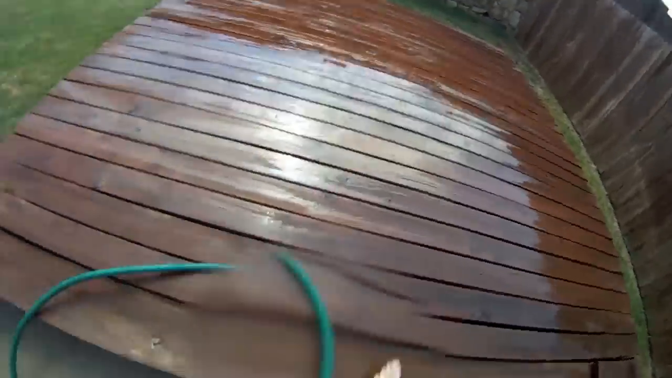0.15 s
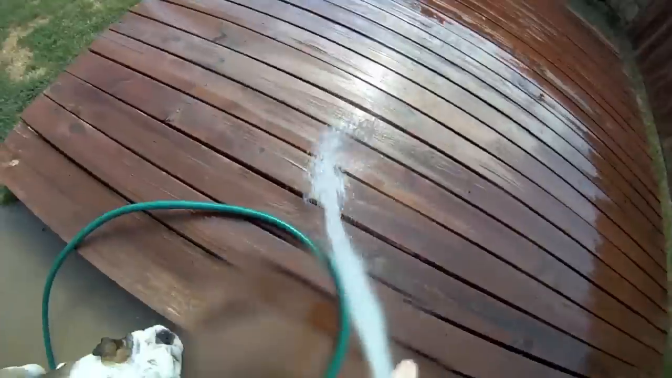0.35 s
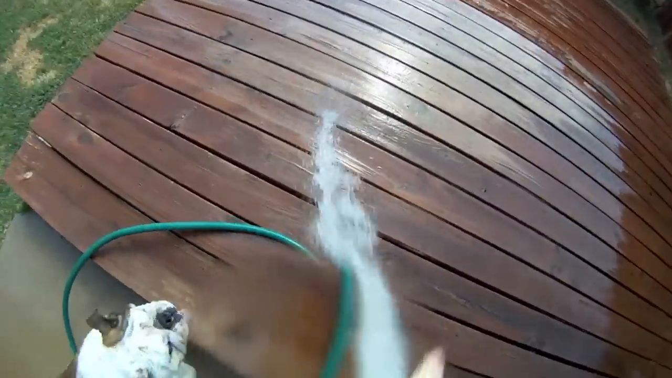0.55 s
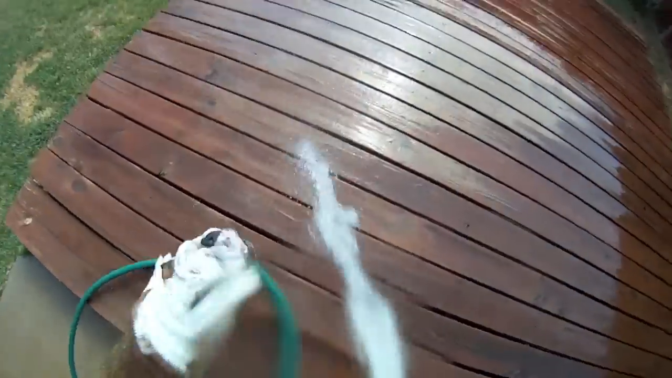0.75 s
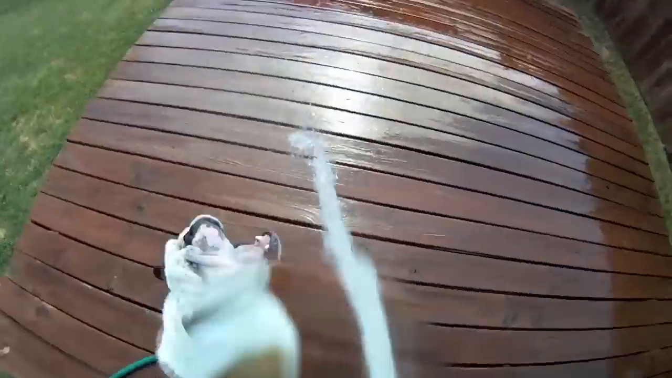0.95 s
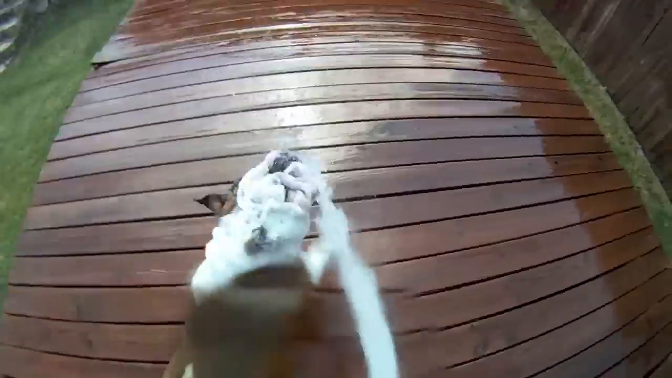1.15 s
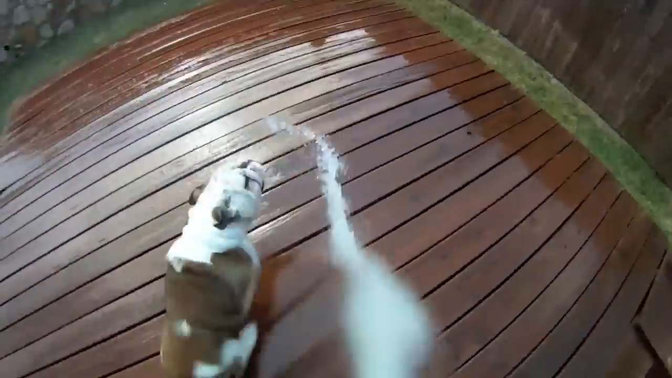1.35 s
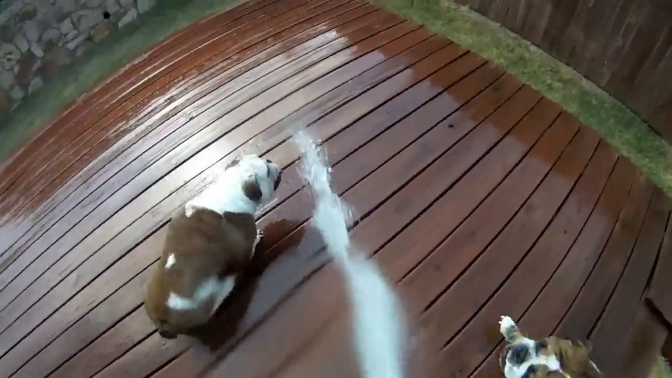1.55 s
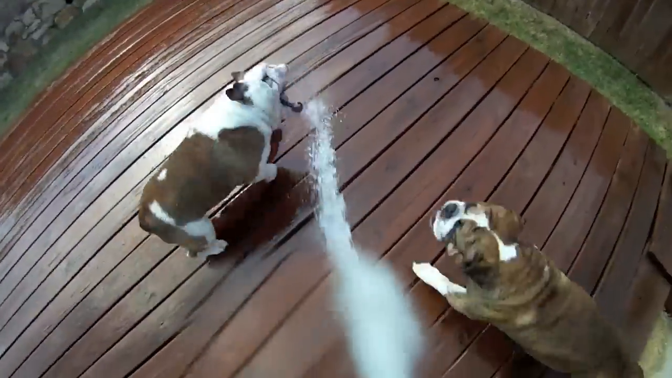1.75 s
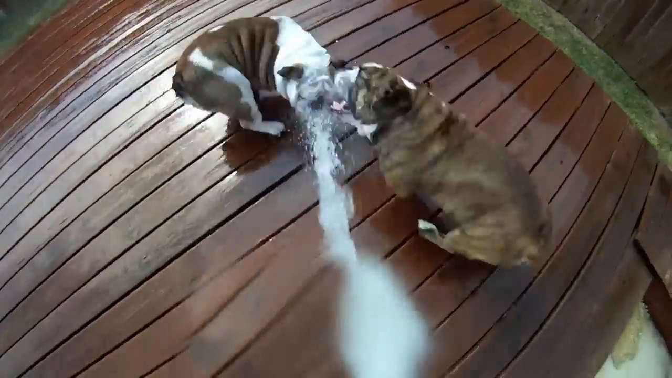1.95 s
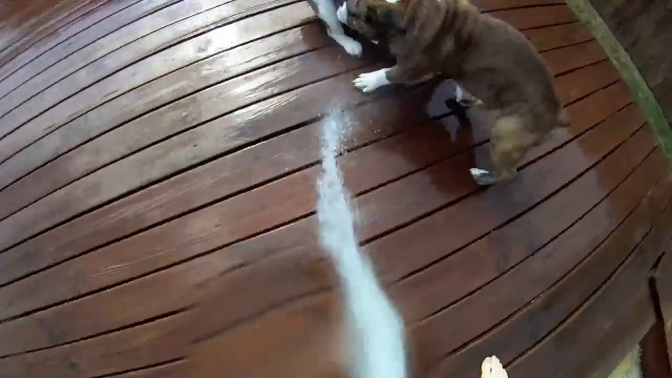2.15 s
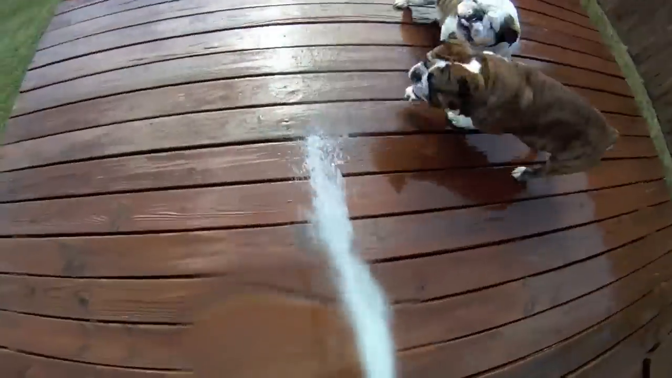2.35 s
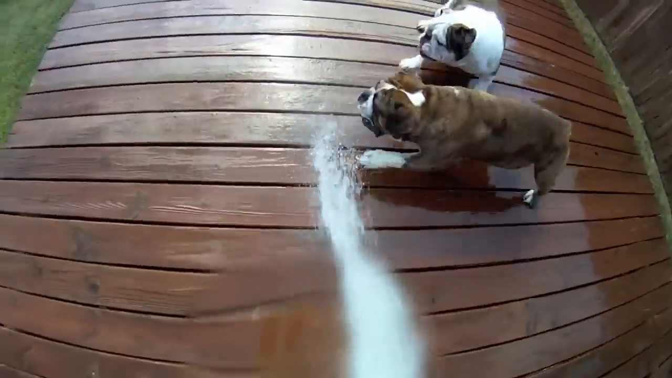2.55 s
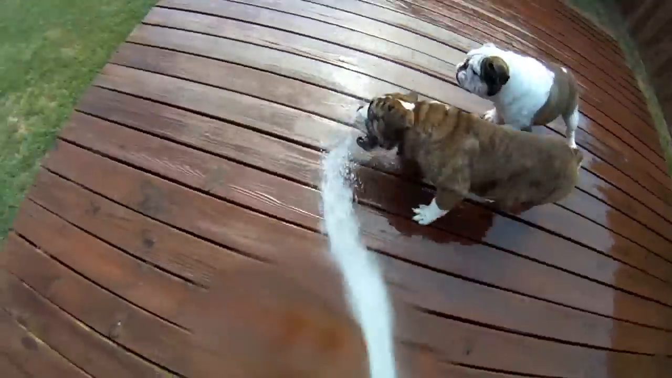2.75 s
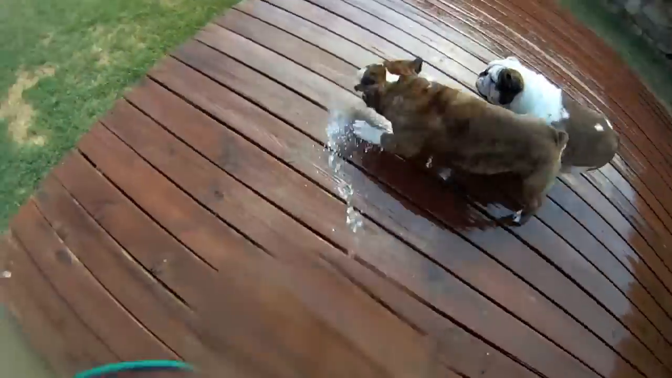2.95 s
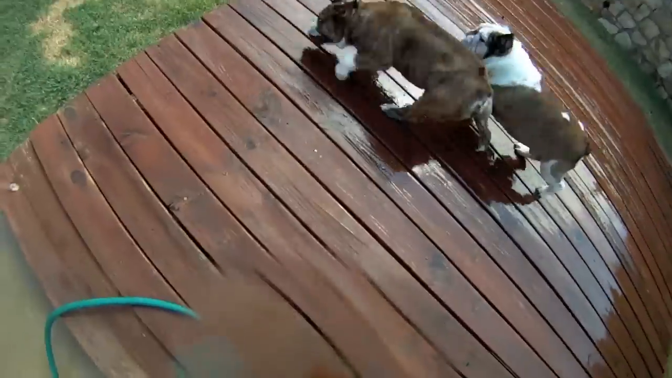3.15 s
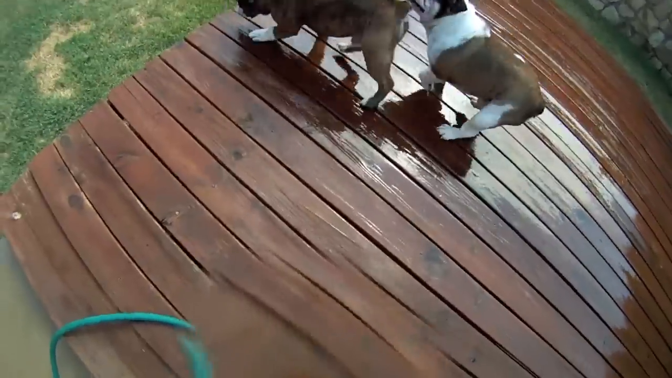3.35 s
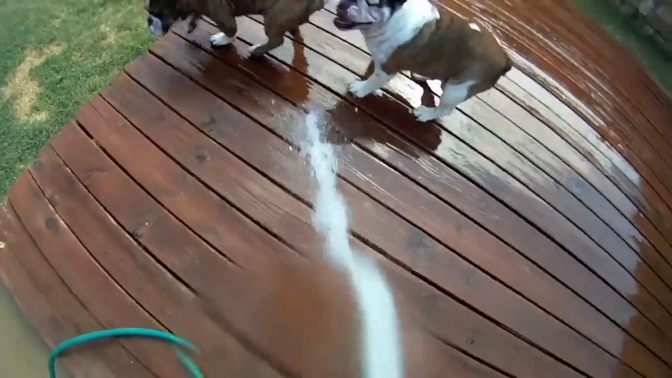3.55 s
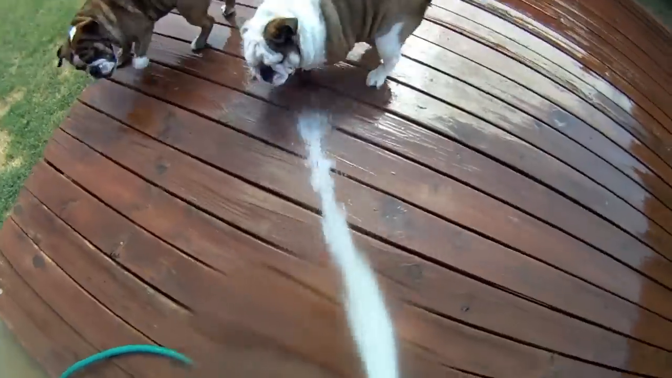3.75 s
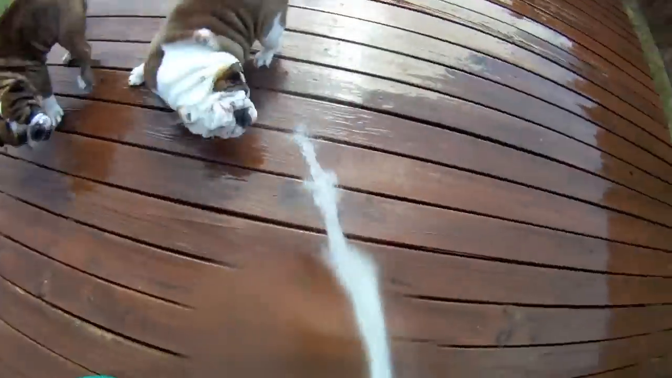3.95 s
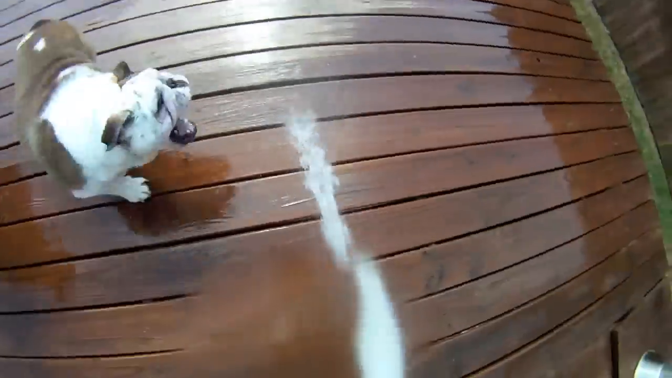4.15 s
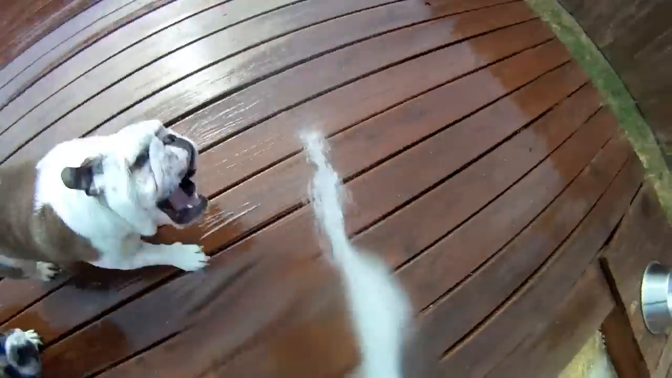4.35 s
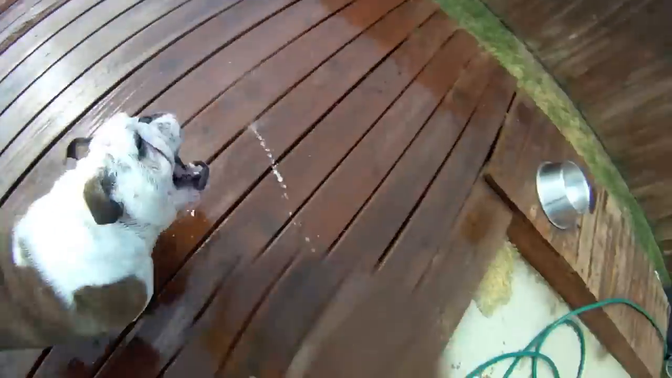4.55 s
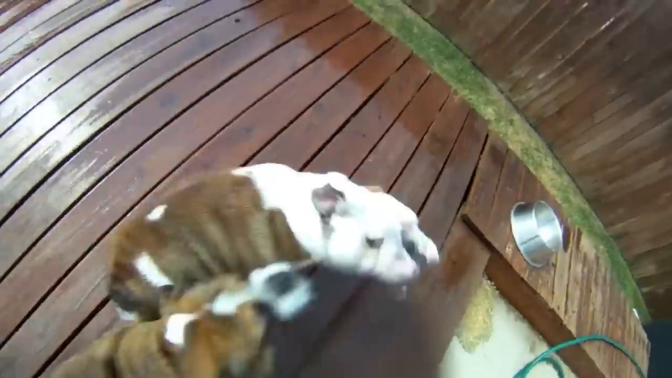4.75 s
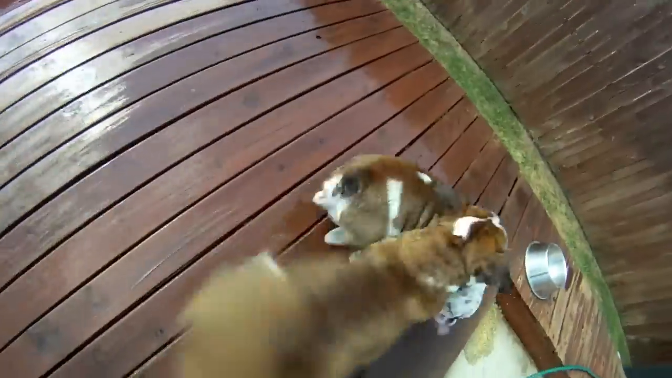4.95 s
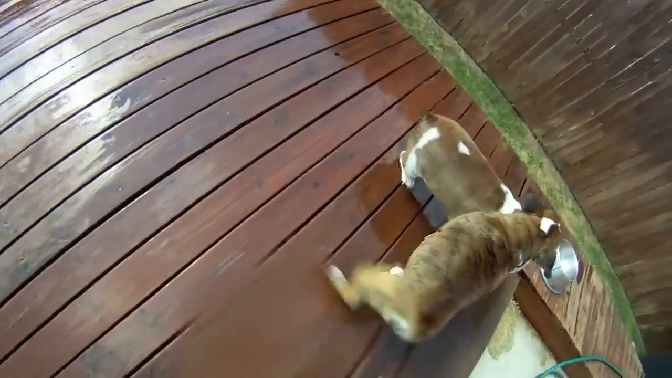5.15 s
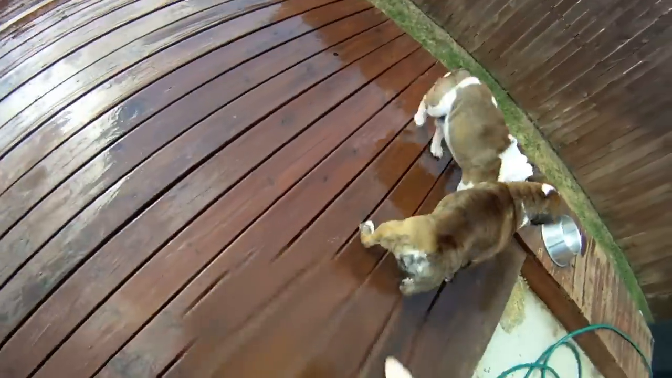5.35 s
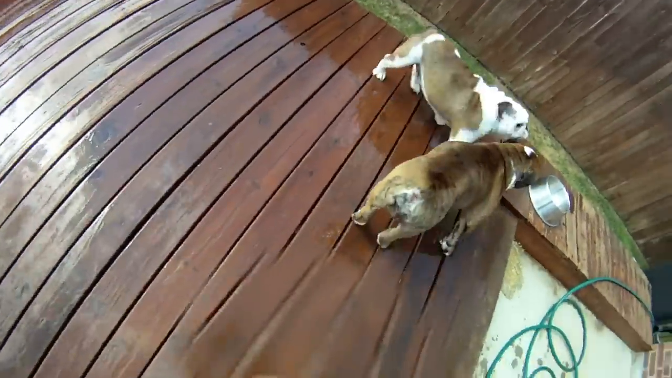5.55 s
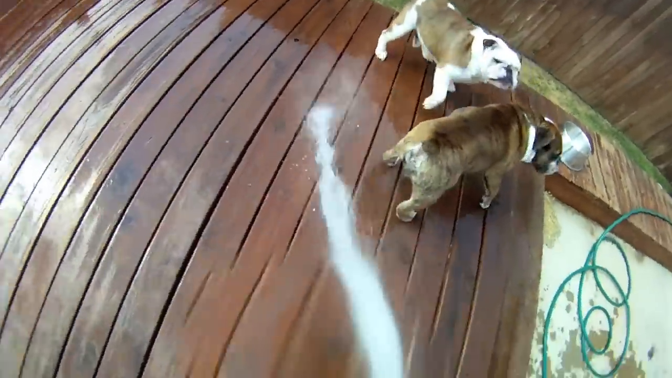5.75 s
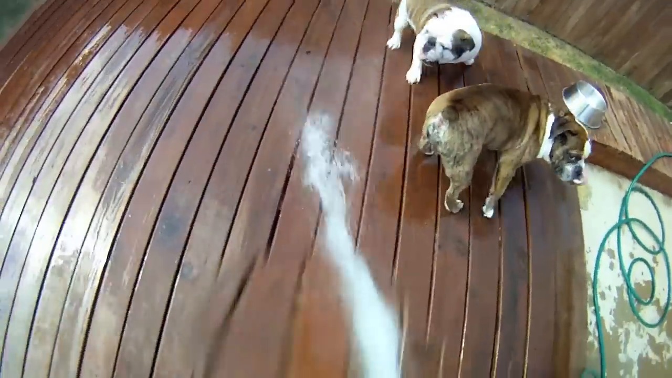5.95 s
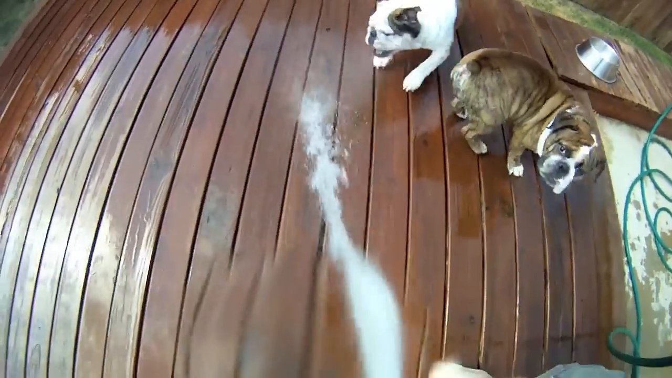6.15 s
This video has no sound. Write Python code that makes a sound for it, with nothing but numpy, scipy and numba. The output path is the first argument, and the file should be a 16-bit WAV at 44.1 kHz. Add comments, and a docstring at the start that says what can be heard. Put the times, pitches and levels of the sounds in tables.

```python
"""A garden hose on a wooden deck, heard from inside a waterproof case fixed to the spray gun.
Trigger snaps, a rustle of handling, a knock of the hand and claws come first; then the jet roars through
the case's resonances. The valve slams and the hose kicks; drops and claws follow, then a second burst,
more paws and a scuff of the hand on the grip. A last burst is still running at the end.
Loud snaps overload the recorder and duck its gain."""
import sys
import numpy as np
from scipy import signal
from scipy.fft import rfft, irfft, next_fast_len
from scipy.io import wavfile
from numba import njit

SR = 44100
rng = np.random.default_rng(int(sys.argv[2]) if len(sys.argv) > 2 else 0)


def store_pcm(level_fs):
    """Save levels as 16-bit WAV."""
    pcm = np.round(np.clip(level_fs, -1, 1) * 32767).astype(np.int16)
    wavfile.write(sys.argv[1], SR, np.atleast_2d(pcm).T)


N = 273861
TIME = np.arange(N) / SR
SIZE = 2 * next_fast_len(N // 2 + 8192)  # transform length, with room for filter tails
HZ = np.arange(SIZE // 2 + 1) * SR / SIZE

# trigger pulls: opens_s, shuts_s, rise_s, opening squirt relative_db
PULLS = [(0.27, 2.997, 0.056, -19), (3.539, 4.563, 0.06, -20.5), (5.688, 6.4, 0.039, -17)]
# lighter clacks as the trigger is eased: start_s, relative_db
CLACKS = [(2.9390, -8), (4.5244, -10.5)]
# soft bumps of the hand and of paws: start_s, relative_db, pitch_hz
BUMPS = [(0.021, 4.5, 144), (0.075, -3, 155), (0.208, -6, 119), (1.445, -9.5, 98), (4.921, -34.5, 130),
         (4.992, -30.5, 110), (5.1, -36, 120), (5.251, -11, 112)]
BUMP_SWELL_S = 0.0068
# ring of the gun's hollow body: pitch_hz, relative_db, t60_s
BODY_MODES = [(249, -14, 0.061), (322, -11, 0.021), (579, -6.5, 0.0094)]


def from_db(db):
    """Decibels to gain."""
    return 10 ** (np.asarray(db) / 20)


def rms_one(x):
    """Scale to unit power."""
    return x / np.sqrt(np.mean(x ** 2) + 1e-20)


def through(x, response):
    """Filter by a frequency response."""
    return irfft(rfft(x, SIZE) * response, SIZE)[:N]


def noise(spectrum):
    """Noise of unit power, coloured by (Hz, dB per Hz) points joined along log frequency."""
    hz, db = np.transpose(spectrum)
    colour_db = np.interp(np.log(HZ + 1), np.log(hz), db)
    return rms_one(through(rng.standard_normal(N), from_db(colour_db)))


def drift(rate_hz):
    """Slow random wandering with a spread of one."""
    return rms_one(through(rng.standard_normal(N), 1 / (1 + (HZ / rate_hz) ** 2)))


def bell(s, half):
    """A smooth swell of height one around a moment."""
    return np.exp(-((TIME - s) / half) ** 2)


def clicks(rows):
    """One impulse for each (s, dB) row."""
    out = np.zeros(N)
    for s, db in rows:
        at = max(0, round(s * SR))
        out[at:at + 1] += from_db(db)
    return out


def bounces(rows, length, bounce_db):
    """Each contact is followed by a brief burst of smaller, uneven rebounds."""
    out, age = np.zeros(N + SR), TIME[:SR // 40]
    chances = rng.standard_normal((len(rows), len(age)))
    for (s, db), chance in zip(rows, chances):
        burst = chance * np.exp(-age / length)
        burst *= from_db(bounce_db) / np.linalg.norm(burst)
        burst[0] += 1  # the contact itself
        at = max(0, round(s * SR))
        out[at:at + len(age)] += from_db(db) * burst
    return out[:N]


def ring_decay(t60):
    """Gain per sample that falls by 60 dB in t60 seconds."""
    return from_db(-60 / (t60 * SR))


def ring(x, hz, t60):
    """A two-pole resonator: a unit click sets a sine of height one ringing."""
    r, w = ring_decay(t60), 2 * np.pi * hz / SR
    return signal.lfilter([0, np.sin(w)], [1, -2 * r * np.cos(w), r * r], x + 1e-18)


def strike(hits, modes):
    """Ring a table of (Hz, dB, t60) modes together."""
    return sum(ring(hits * from_db(db), hz, t60) for hz, db, t60 in modes)


def swing(rows, hz, swell):
    """A low swing for each (s, dB) row; it swells and dies in a few cycles."""
    age = TIME[:SR // 4]
    envelope = (age / swell * np.exp(1 - age / swell)) ** 2
    return signal.oaconvolve(clicks(rows), envelope * np.sin(2 * np.pi * hz * age))[:N]


def drops(per_s, spread_db):
    """Impulses land at random like drops, most small and a few large."""
    sizes = from_db(spread_db * np.minimum(rng.exponential(1, N), 4))
    signed = sizes * rng.choice([-1, 1], N)
    return rms_one(signed * (rng.random(N) < per_s / SR))


def bright_band(x):
    """The bright band of the scratches and of the fine grains, 2.2 to 9 kHz."""
    return signal.sosfilt(signal.butter(1, [2200, 9000], "band", fs=SR, output="sos"), x)


def case_response():
    """Steep-sided resonances made causal (minimum phase); a unit click comes out with height one."""
    # resonances of gun and case: pitch_hz, width_hz, relative_db
    resonances = [(336, 95, -21.2), (483, 131, -11.7), (706, 212, -15.8), (944, 193, -1.2),
                  (1210, 123, -4.7), (1589, 220, -2.8), (1976, 357, -0.4), (2345, 210, 0.0),
                  (2914, 229, -10.4), (3214, 550, -22.0), (3734, 377, -19.0), (4632, 428, -35.9),
                  (5290, 511, -39.0), (7079, 1704, -41.6), (8300, 488, -26.2), (9059, 407, -21.8),
                  (9658, 220, -11.6), (10020, 270, -13.2), (10401, 210, -18.3), (10788, 128, -23.4),
                  (11050, 193, -22.1), (11504, 108, -37.6), (11882, 70, -37.5), (12121, 70, -36.8),
                  (12954, 264, -24.5), (13216, 114, -24.4), (13597, 215, -20.3), (13980, 299, -15.8),
                  (14343, 227, -14.5), (14931, 315, -24.2)]
    power = sum(from_db(db) ** 2 / (1 + (2 * (HZ - hz) / width) ** 2) ** 2
                for hz, width, db in resonances)
    cepstrum = irfft(np.log(power) / 2)
    response = np.exp(rfft(2 * cepstrum[:SIZE // 2], SIZE))
    return response / np.abs(irfft(response)).max()


def yard():
    """A wash of coloured outdoor noise, with a faint narrow tone from noise ringing one resonator."""
    # outdoor wash: pitch_hz, relative_db per Hz
    wash_colour = [(100, -6), (350, -6.5), (650, -10), (900, -2), (1140, -4), (1400, -22), (2300, -3),
                   (4000, -14), (6000, -29), (9500, -15), (12000, -30), (14500, -24)]
    faint_tone = rms_one(ring(rng.standard_normal(N), hz=1159, t60=.12))
    return from_db(-58.0) * noise(wash_colour) + from_db(-67.5) * faint_tone


def rustling(case):
    """Random impulses rustle through the case, with bright grains, in flurries over a constant trickle."""
    # flurries of handling, water and paws: centre_s, half_length_s, rustle level_db
    flurries = [(0.153, 0.12, -44.5), (3.247, 0.068, -58), (4.846, 0.079, -59), (5.19, 0.11, -64)]
    trickle_db, grains_db = -66.5, -10.5  # the grains are relative to their flurry
    rustle = rms_one(through(drops(per_s=1500, spread_db=2.5), case))
    grains = rms_one(bright_band(drops(per_s=3000, spread_db=2.5)))
    flurry = sum(from_db(db) * bell(s, half) for s, half, db in flurries)
    return np.hypot(flurry, from_db(trickle_db)) * rustle + flurry * from_db(grains_db) * grains


def claws(case):
    """Claws and big drops hit the boards: a dull tap through the case and a longer bright scratch."""
    # contacts: start_s, dull body relative_db, bright scratch relative_db
    contacts = [(0.2078, -34, -58.5), (3.1018, -51, -48), (3.188, -49, -68), (3.474, -48.5, -69),
                (4.6955, -52, -61), (4.8413, -51, -47), (4.8735, -50, -53), (4.9048, -53, -50),
                (4.991, -35, -58), (5.099, -47, -66), (5.152, -49, -55), (5.177, -56, -47),
                (5.331, -56, -53)]
    dull = bounces([(s, db) for s, db, _ in contacts], length=0.0025, bounce_db=13)
    bright = bounces([(s, db) for s, _, db in contacts], length=0.008, bounce_db=20)
    return through(dull, case) + bright_band(bright)


def scuff():
    """A hand slides briefly on the grip: coloured noise with an unsteady level."""
    # one slide: centre_s, half_length_s, level_db
    slide = (5.53, 0.11, -54.5)
    # its colour: pitch_hz, relative_db per Hz
    scuff_colour = [(200, -37), (600, -19), (900, 3.5), (1300, -1), (2400, -24), (5000, -35), (15000, -54)]
    s, half, db = slide
    unsteady = from_db(db + 2.1 * drift(rate_hz=38))
    return unsteady * np.exp(-((TIME - s) / half) ** 4) * noise(scuff_colour)


def handling():
    """The hand rumbles softly on the grip, and more while the gun shakes after a bump."""
    # the hand's rumble: pitch_hz, relative_db per Hz
    hand_colour = [(8, -22.5), (28, 3.5), (55, -3), (90, -8.5), (125, -10.5), (175, -21.5), (300, -32),
                   (600, -48.5), (4000, -120)]
    steady_db, shake_db, fade_db_per_s = -41.5, -17.5, 125.5  # the shake is relative to its bump
    shake = 0
    for s, db, _ in BUMPS:
        rise = np.clip((TIME - s) / BUMP_SWELL_S, 0, 1)
        shake = shake + rise * from_db(db + shake_db - fade_db_per_s * np.abs(TIME - s))
    return (from_db(steady_db) + shake) * noise(hand_colour)


def kicks():
    """The gun recoils when the flow starts, eases and stops, and swings when it is bumped."""
    lead_s = 0.01  # easing and shutting recoils begin this early
    recoils = ([(opens, -2.5) for opens, *_ in PULLS]
               + [(s - lead_s, -8.5) for s, _ in CLACKS]
               + [(shuts - lead_s, -2.5) for _, shuts, *_ in PULLS])
    out = swing(recoils, hz=87.5, swell=0.0043)
    out = out + sum(swing([(s, db)], hz, BUMP_SWELL_S) for s, db, hz in BUMPS)
    return signal.sosfilt(signal.butter(1, 30, "high", fs=SR, output="sos"), out + 1e-18)


def valve():
    """The stopped water column and the grip knock hollowly, with a thin metallic ring on top."""
    # hard knocks of the grip: start_s, relative_db, pitch_hz
    grip_knocks = [(0.021, 9, 910), (0.052, -12, 885), (0.0770, -6.5, 890), (0.0850, -6.5, 845),
                   (0.214, -27.5, 850), (3.5661, -9, 990), (5.252, -38.5, 974), (5.709, -13.5, 1150)]
    # ring of the water column: pitch_hz, relative_db, t60_s
    column_modes = [(440, -6.5, 0.008), (680, -4, 0.0071), (860, 5, 0.019), (1060, -11.5, 0.055)]
    # ring struck by the hits: a thin metallic ring of the valve, and a long low ring of the case near 1.1 kHz:
    # pitch_hz, relative_db, t60_s
    struck_modes = [(1140, -33, .16), (11120, -15, 0.021), (12120, -34.5, 0.08), (12700, -22, 0.025)]
    lead_s, rebound_s, rebound_db = 0.0027, 0.00429, -10.5
    seats = [shuts - lead_s for _, shuts, *_ in PULLS]
    # water hammer as the valve seats, then its rebound
    hammer = clicks([(s, 0) for s in seats]) + clicks([(s + rebound_s, rebound_db) for s in seats])
    hammer = from_db(-4.5) * hammer
    knock = sum(ring(clicks([(s, db)]), hz, t60=0.03) for s, db, hz in grip_knocks)
    hits = from_db(-3) * hammer + clicks([(s, db) for s, db, _ in grip_knocks])
    metal = from_db(-1) * strike(hits, struck_modes)
    return strike(hammer, column_modes) + knock + metal + strike(hits, BODY_MODES)


def trigger(case):
    """Each snap rings the trigger and jolts the gun's body and the case; the clacks are thinner."""
    # trigger snaps: start_s, contact relative_db, jolt to the gun's body relative_db
    snaps = [(0.0200, 11.5, 8.5), (0.0513, -12, 1), (0.0739, 3.5, -7), (0.3089, 14, 10.5),
             (0.3615, 20.5, 20), (3.5235, -13.5, -16), (3.5872, 14, 13), (5.6630, -16, -33),
             (5.7311, 14, 14.5)]
    # ring of the lever: pitch_hz, relative_db, t60_s of each of two resonators in a row
    lever_modes = [(899, -16, 0.021), (1935, -20.5, 0.0037), (2250, 0, 0.0052), (3500, -14, 0.0054),
                   (9810, -10.5, 0.0038), (13790, -12, 0.0046)]
    # ring of the clacks: pitch_hz, relative_db, t60_s
    clack_modes = [(1950, -3.5, 0.011), (3500, -3, 0.016), (3860, -11, 0.021), (8330, -2.5, 0.0065)]
    contacts = [(s, db) for s, db, _ in snaps]
    jolts = [(s, db) for s, _, db in snaps]
    hits = clicks(contacts)
    rattle = through(bounces(contacts, length=0.0047, bounce_db=11), case)
    # the plastic lever's ring builds up before it dies
    lever = 0
    for hz, db, t60 in lever_modes:
        build_up = ring(ring(hits * from_db(db), hz, t60), hz, t60)
        lever = lever + build_up * 2 * np.e * (1 - ring_decay(t60))
    body = from_db(-4.0) * strike(clicks(jolts), BODY_MODES)
    body = body + from_db(-11) * swing(jolts, hz=105, swell=0.0042)
    clacks = strike(clicks(CLACKS), clack_modes)
    return from_db(-3) * lever + body + from_db(-14.0) * rattle + clacks


def squirts(case):
    """The narrow valve gap sputters and hisses at each opening and closing, with a faint leak beside."""
    level = 0
    for opens, shuts, _, open_db in PULLS:
        opening = from_db(open_db) * bell(opens + 0.015, half=0.015)
        shutting = from_db(-17.5) * bell(shuts - 0.011, half=0.0093)
        # the barely seated valve leaks
        leak = from_db(-43) * (bell(opens - 0.015, half=0.011) + bell(shuts, half=0.011))
        level = level + opening + shutting + leak
    sputter = from_db(2.55 * drift(rate_hz=84))
    hiss = noise([(100, -0.5), (1000, 3.5), (2500, 6.0), (5000, -10.0), (10000, -11.5), (15000, -23.5)])
    cased = rms_one(through(rng.standard_normal(N), case))
    return level * sputter * (from_db(-4.0) * hiss + from_db(2.5) * cased)


def jet(case):
    """Turbulence in the nozzle shakes the case and the hose for as long as the valve is open."""
    # strength of the jet in each burst: time_s, roar relative_db, hose rumble relative_db
    first_jet = [(0.7, -15, -20.5), (0.75, -16, -18), (0.98, -16, -21.5), (1.08, -17, -24),
                 (1.32, -16.5, -24), (1.37, -16, -29), (1.46, -17.5, -20), (1.51, -16.5, -24),
                 (2.9, -15, -22)]
    second_jet = [(3.82, -13.5, -25.5), (4.292, -15, -22.5), (4.308, -16.5, -27), (4.5, -15, -23.5)]
    third_jet = [(5.97, -14, -20.5), (6.156, -14, -20.5), (6.19, -15, -18)]
    # flow rumble in the hose: pitch_hz, relative_db per Hz
    hose_colour = [(10, -37.5), (25, -14), (55, -7), (90, -1), (120, 2), (160, -9), (220, -19.5),
                   (300, -43), (600, -54), (4000, -120)]
    waver_db = 0.75 * drift(rate_hz=400) + 0.49 * drift(rate_hz=3)
    turbulence = rng.standard_normal(N) * from_db(waver_db)
    roar = from_db(0.27) * rms_one(through(turbulence, case))
    rumble = noise(hose_colour) * from_db(-0.8 + 1.8 * drift(rate_hz=16))
    out = 0
    for (opens, shuts, rise, _), curve in zip(PULLS, (first_jet, second_jet, third_jet)):
        s, roar_db, rumble_db = np.transpose(curve)
        flow = np.clip((TIME - opens) / rise, 0, 1) * np.clip((shuts - TIME) / 0.0012, 0, 1)
        roar_level = from_db(np.interp(TIME, s, roar_db))
        rumble_level = from_db(np.interp(TIME, s, rumble_db))
        out = out + flow * (roar_level * roar + rumble_level * rumble)
    # the flow falters just after the trigger is eased
    falter = sum(bell(s + 0.021, half=0.017) for s, _ in CLACKS)
    return out * from_db(-6 * falter)


def scene():
    """Everything reaches the one microphone inside the case."""
    case = case_response()
    background = yard() + rustling(case) + claws(case)
    gun = scuff() + handling() + kicks() + valve() + trigger(case)
    water = squirts(case) + jet(case)
    return (background + gun + water)[None]


@njit
def gain_control(x, limit, attack, hold, release):
    """Gain at each sample: the cut in dB grows while the held output peak is over the limit, then fades."""
    gain, cut, held = np.empty_like(x), 0.0, 0.0
    for i in range(len(x)):
        gain[i] = 10 ** (-cut / 20)
        held = max(abs(x[i] * gain[i]), held * (1 - hold))
        if held > limit:
            cut += attack * 20 * np.log10(held / limit)
        cut -= cut * release
    return gain


def record(dry):
    """Gain control ducks after the snaps, their peaks are squashed, the top is cut."""
    limit, attack_s, hold_s, release_s = 0.84, 0.0037, 0.0032, 0.12
    ahead_s = 0.0011  # the gain is applied this much early
    top, knee, cutoff_hz = .88, 13.0, 15400
    gain = gain_control(dry[0], limit, 1 / (attack_s * SR), 1 / (hold_s * SR), 1 / (release_s * SR))
    level = dry[0] * np.interp(TIME + ahead_s, TIME, gain)
    squashed = level / (1.5 + np.abs(level / top) ** knee) ** (1 / knee)
    return through(squashed, 1 / (1 + (HZ / cutoff_hz) ** 120))[None]


dry = scene()
out = record(dry)
store_pcm(out)
```